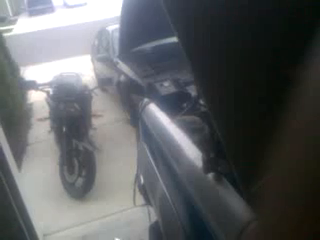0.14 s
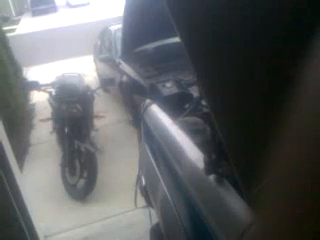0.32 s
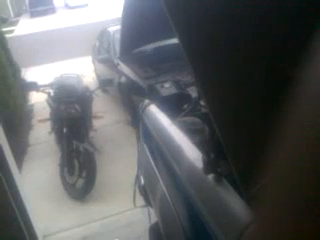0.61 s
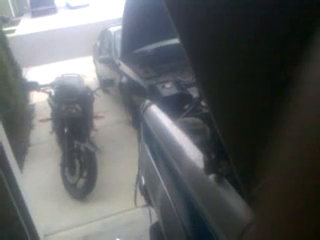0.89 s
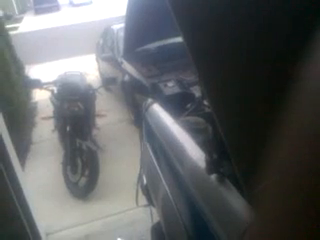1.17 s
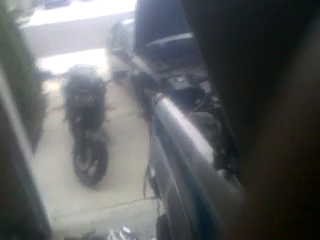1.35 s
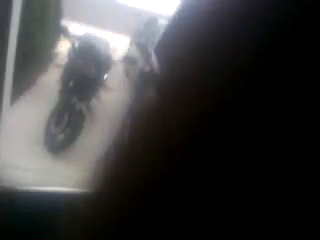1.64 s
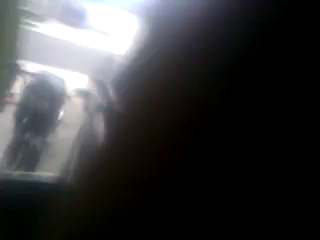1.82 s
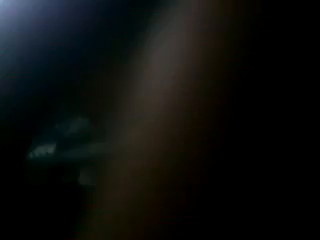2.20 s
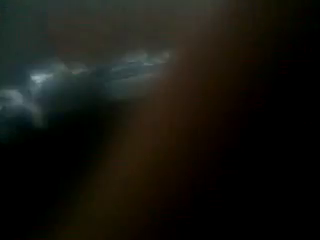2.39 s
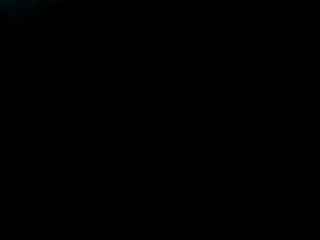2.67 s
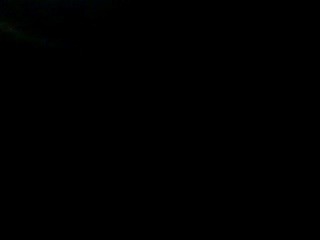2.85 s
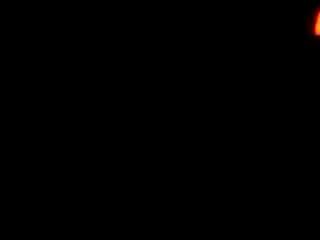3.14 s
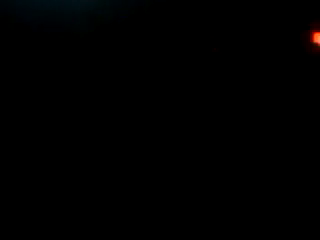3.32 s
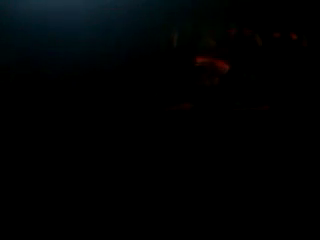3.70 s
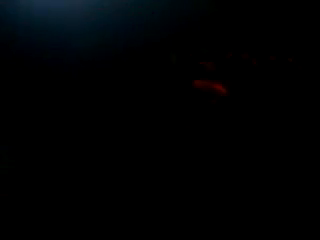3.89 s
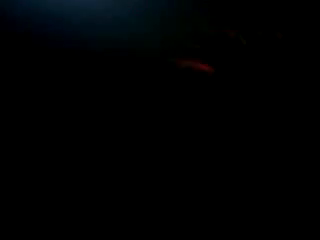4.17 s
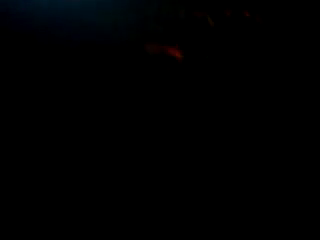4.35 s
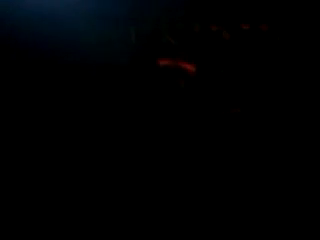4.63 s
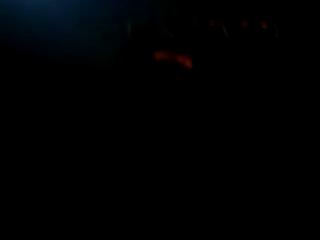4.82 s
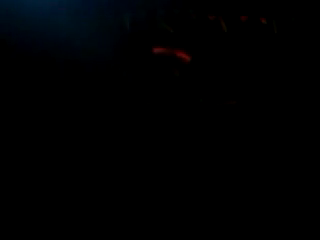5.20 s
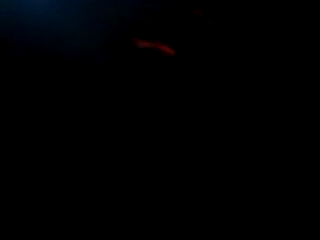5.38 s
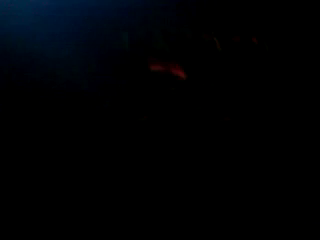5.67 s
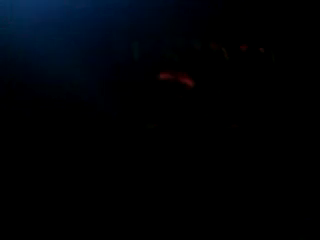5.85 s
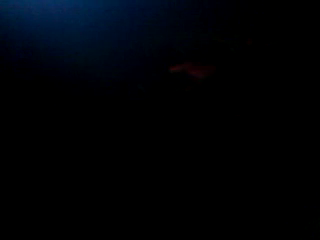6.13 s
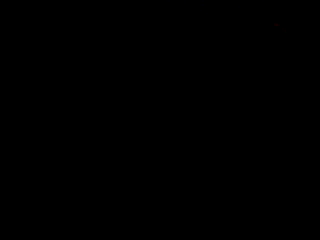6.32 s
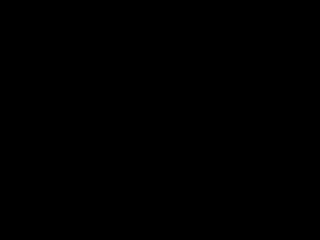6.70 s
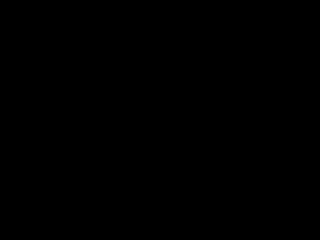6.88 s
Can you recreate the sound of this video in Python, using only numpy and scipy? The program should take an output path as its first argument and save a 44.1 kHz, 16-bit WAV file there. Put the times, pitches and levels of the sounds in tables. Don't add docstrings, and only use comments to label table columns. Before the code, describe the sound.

A large diesel truck idles unevenly close by, its block knocking sharply over fan hiss and low rumble. Hand bumps rattle the microphone as it moves into the cab, where the clatter dulls and low air boom takes over. The door thuds shut, a latch snaps, idling continues, then three quick throttle stabs roar and fall away. The sound is narrow and lo-fi, with brief thin whistles.

```python
import sys
import numpy as np
from scipy import signal
from scipy.fft import rfft, irfft
from scipy.io import wavfile
from scipy.ndimage import uniform_filter1d

SR = 44100
rng = np.random.default_rng(int(sys.argv[2]) if len(sys.argv) > 2 else 0)


def undo_db(level):
    steps = np.asarray(level, float) / 20
    return 10 ** steps


def transcribe(signal):
    frames = np.atleast_2d(signal).T
    limited = np.clip(frames, -1, 1)
    pcm = np.round(limited * 32767).astype(np.int16)
    wavfile.write(sys.argv[1], SR, pcm)


N = 309573
T = np.arange(N) / SR


def level(x, db):
    return x * undo_db(db) / np.sqrt(np.mean(x ** 2))


def curves(table):
    s, *columns = np.transpose(table)
    return [np.interp(T, s, c) for c in columns]


def near(x, centre, span):
    return np.exp(-((x - centre) / span) ** 2)


def noise():
    return rng.standard_normal(N)


def walk(rate):
    k = int(SR / rate)
    held = np.repeat(rng.standard_normal(N // k + 1), k)
    return 1.7 * uniform_filter1d(uniform_filter1d(held, k), k)[:N]


def colour(x, points):
    hz, db = np.transpose(points)
    grid = np.maximum(np.arange(4097) * SR / 8192, 1)
    gain = np.interp(np.log(grid), np.log(hz), db)
    gain -= 60 * np.clip(np.log2(grid / hz[-1]), 0, 1)
    gain -= 40 * np.clip(np.log2(hz[0] / grid), 0, 1)
    cep = irfft(gain * np.log(10) / 20)
    cep[1:4096] *= 2
    cep[4097:] = 0
    return level(signal.fftconvolve(x, irfft(np.exp(rfft(cep))))[:N], 0)


def ring(x, hz, width):
    return level(signal.lfilter(*signal.iirpeak(hz, hz / max(width, 2), fs=SR), x), 0)


def add(out, s, sound):
    i = int(s * SR)
    out[i:i + len(sound)] += sound[:N - i]


def bursts(phase, decay, floor, scatter_db, pattern):
    cylinder_db = [-0.5, -9, -2, -4.5, -7, -3.5, 0, -5.5]
    k = phase.astype(int)
    db = pattern * np.array(cylinder_db)[k % 8] + scatter_db * rng.standard_normal(N // 100)[k]
    envelope = undo_db(db) * (floor + np.exp(-(phase % 1) / decay))
    return noise() * uniform_filter1d(envelope, 60)


def clatter(rate, spread_db):
    size_db = spread_db * np.minimum(rng.exponential(size=N), 3)
    return (rng.random(N) < rate / SR) * undo_db(size_db) * np.sign(noise())


def chugs():
    # t/s, length/s, level over the soft ones/dB
    hard_firings = [(0.026, 0.029, 5.5), (0.139, .12, 7.5), (0.391, 0.057, 5), (0.484, .12, 7.5),
                    (0.742, 0.026, 2), (0.861, 0.084, 4), (1.063, 0.071, 6.5), (1.225, 0.076, 4.5),
                    (1.42, 0.053, 5), (1.546, 0.09, 4), (1.75, 0.13, 3.5), (1.937, 0.058, 5),
                    (2.13, .04, 2), (2.227, 0.039, 5), (2.304, 0.03, 3.5), (2.386, 0.068, 3),
                    (2.625, 0.079, 4), (2.823, 0.036, 4), (3.083, 0.018, 4.5), (3.145, 0.043, 5),
                    (3.46, 0.11, 1.5), (3.678, 0.055, 6), (3.845, 0.075, 4), (4.016, 0.07, 5),
                    (4.194, 0.073, 6), (4.35, 0.087, 5.5), (4.54, 0.068, 5.5), (4.712, 0.07, 6),
                    (4.882, 0.07, 6), (5.04, 0.039, 2.5)]
    attack_s, release_s = 0.0093, 0.036
    rises = []
    for s, hold, db in hard_firings:
        times = (s - attack_s, s, s + hold, s + hold + release_s)
        rises.append(np.interp(T, times, (0, db, db, 0)))
    return np.max(rises, axis=0)


def hiss(phase, load):
    # f/Hz, level/dB
    idle_air = [(1710, -30), (2900, -15), (3620, -11), (4130, -9), (5100, -11), (6740, -12), (7270, 5),
                (7500, -30.5), (9750, -59), (16500, -120)]
    # f/Hz, level/dB
    intake_roar = [(1710, -33.5), (2900, -26.5), (3430, -9), (4620, -2), (6710, -6.5), (7500, 6.5),
                   (9750, -42.5), (16500, -120)]
    air = bursts(phase, .3, 4, .7, .2)
    return (1 - load) * colour(air, idle_air) + load * colour(air, intake_roar)


def injectors(inside):
    # f/Hz, width/Hz, level outside/dB, level inside/dB
    line_modes = [(4040, 38, -42, -55), (4130, 110, -48.5, -58), (4400, 90, -52, -56)]
    # t/s, level over their murmur/dB
    sung_moments = [
        (.3, 7),
        (.5, 3),
        (.76, 6),
        (.89, 5),
        (1.13, 4),
        (1.25, 7),
        (1.55, 4),
        (1.97, 5),
    ]
    streaks = 2.2 * walk(11) + sum(db * near(T, s, .035) for s, db in sung_moments)
    out = np.zeros(N)
    for hz, width, out_db, in_db in line_modes:
        out += undo_db(out_db + inside * (in_db - out_db) + streaks) * ring(noise(), hz, width)
    return out


def panels(phase):
    # f/Hz, level/dB
    panel_response = [(160, -20), (280, -2.5), (437, -6.5), (544, -4.5), (630, -3), (668, -4.5),
                      (755, -1.5), (900, -1.5), (1170, -12.5), (1980, -120)]
    return colour(bursts(phase, 1.0, 1.0, 1.5, .3), panel_response)


def rumble(phase, inside):
    # f/Hz, level/dB
    fender_response = [(8.8, -29), (15, -25), (54, -8.5), (168, -4.5), (330, -16.5), (430, -30),
                       (730, -120)]
    # f/Hz, level/dB
    cab_response = [(20, -1), (40, -1), (62, 0), (90, -9), (140, -0.5), (170, 0.5), (200, -12.5), (260, -3),
                    (330, -15)]
    # f/Hz, width/Hz, level outside/dB, level inside/dB
    air_modes = [(125.2, 9.2, -8, -12), (165, 14, -12, -3), (85.6, 12, -30, -3.5)]
    shake = bursts(phase, .5, 2, 1, .3)
    total = (1 - inside) * colour(shake, fender_response) + inside * colour(shake, cab_response)
    for hz, width, out_db, in_db in air_modes:
        total += undo_db(out_db + inside * (in_db - out_db) + walk(14)) * ring(shake, hz, width)
    return level(total, 0)


def cab_mode(phase, hz, inside, rev, off):
    mode_hz, sing_hz = 241.7, 240
    pulses = np.diff(np.floor(phase), prepend=0.)
    sung = ring(level(pulses, 0) + level(noise(), 0), mode_hz, 25)
    sung = ring(sung, mode_hz, 40)
    sung = sung / np.sqrt(uniform_filter1d(sung ** 2, size=5000))
    crossing = near(hz * np.round(sing_hz / hz), sing_hz, 4.5)
    lope_db = 5 * np.cos(2 * np.pi * (phase / 8 - 0.79))
    out_db, in_db = -52.5, -47
    db = out_db + inside * (in_db - out_db) + (1 - off) * lope_db + rev * (15 + 9 * crossing)
    return undo_db(db) * sung


def thud(db, hz, t60):
    t = np.arange(int(t60 * SR)) / SR
    return undo_db(db) * np.sin(2 * np.pi * hz * t) * 1000 ** (-t / t60) * (1 - np.exp(-t * hz * 8))


def handling():
    # t/s, peak level/dB, f/Hz, t60/s
    bumps = [(2.063, -20.5, 213, 0.034), (2.125, -12, 260, 0.017), (2.181, -14, 202, 0.044),
             (2.207, -15, 180, 0.013), (2.25, -19, 202, 0.051), (2.357, -18.5, 110, 0.028),
             (2.398, -17.5, 277, 0.023), (2.788, -22, 300, 0.016), (2.796, -21, 150, 0.094),
             (2.855, -11.5, 199, 0.012), (2.857, -21, 597, 0.012), (5.302, -19, 165, 0.072),
             (5.279, -22.5, 79, 0.081), (6.33, -21, 160, 0.053), (5.285, -22, 241.4, .15),
             (6.3, -24, 239, 0.11)]
    # t/s, peak level/dB, f/Hz, rise/s
    door = [
        (2.8213, -2.6, 70, .0068),
        (2.8238, -8.5, 105, .007),
        (2.834, -15, 55, .015),
    ]
    # t/s, peak level/dB, strong ring f/Hz, weak ring f/Hz, t60/s
    snaps = [
        (.372, -14, 1900, 2400, .09),
        (2.39, -13, 1900, 2400, .12),
        (2.786, -21, 1500, 5000, .03),
        (2.821, -19, 4200, 600, .04),
        (3.336, -13, 3800, 750, .05),
        (4.255, -29, 6900, 6300, .18),
        (5.785, -19, 2200, 2100, .08),
        (6.262, -14, 1300, 2700, .06),
    ]
    # t/s, peak level/dB, strong ring f/Hz, weak ring f/Hz, t60/s
    latch = (3.333, -4.5, 1700, 6300, .06)
    out = np.zeros(N)
    for s, db, hz, t60 in bumps:
        add(out, s, 2.2 * thud(db, hz, t60))
    for s, db, hz, rise in door:
        u = T[:6000] / rise
        add(out, s, -undo_db(db) * (u * np.exp(1 - u)) ** 2 * np.sin(2 * np.pi * hz * T[:6000]))
    for s, db, strong_hz, weak_hz, t60 in [latch] + snaps:
        crack = rng.standard_normal(8192)[:int(t60 * SR)]
        crack = crack * 1000 ** (-np.arange(len(crack)) / SR / t60)
        low, high = [signal.lfilter(*signal.iirpeak(hz, 3, fs=SR), crack) for hz in (strong_hz, weak_hz)]
        snap = 3 * low + 1.1 * high + .45 * crack
        add(out, s, undo_db(db) * snap / (2.2 * snap[:250].std()))
    return out


def boom(phase, hz, fuel, inside, boom_db, off):
    drift_db = 3.5 * np.maximum(off, 0.3 * (1 - inside)) * walk(12)
    first_db = boom_db + off * (-19.5 + 0.52 * fuel) + drift_db
    second_db = -51.5 + 17.5 * near(2 * hz, 163.6, 25) + 3 * off * walk(12)
    wobble = .02 * walk(8)
    out = np.zeros(N)
    for k, db in enumerate((first_db, second_db), start=1):
        out += np.sqrt(2) * undo_db(db + .5 * walk(11)) * np.sin(2 * np.pi * k * (phase + wobble))
    return out


def rap(phase):
    blows = level(bursts(phase, .5, 1.2, 1.8, 0.25), 0) + level(clatter(900, 1.5), -2.5)
    for _ in range(3):
        blows = ring(blows, 2083, 1140)
    return blows


def knock(phase, inside, load):
    # f/Hz, level/dB
    block_bare = [(350, -38), (600, -7), (631, -15), (669, -15.5), (779, -6.5), (1100, -2), (1190, -3.5),
                  (1500, 3), (1920, 6.5), (2090, -1), (2350, -0.5), (3160, -23.5), (3400, -36.5),
                  (4420, -40), (7480, -120)]
    # f/Hz, level/dB
    block_firewall = [(350, -49.5), (600, -11.5), (741, -9.5), (914, -13), (1250, -7), (1430, -4.5),
                      (1820, 0), (2250, -0.5), (2450, -8.5), (2710, -10), (3400, -26), (4420, -29.5),
                      (7480, -120)]
    # f/Hz, level/dB
    block_loaded = [(350, -28.5), (600, -11.5), (841, -7), (913, -9), (1250, -6.5), (1390, -6), (1500, 1),
                    (2240, 0), (2400, -3), (2750, 0), (3600, -20), (4680, -58), (7920, -120)]
    # f/Hz, width/Hz, level/dB
    block_modes = [(1219, 158, -10.5), (1733, 220, -13), (2255, 68, -22.5), (2500, 48, -32)]
    blows = level(bursts(phase, 0.77, 2.7, 1.16, 0.24), 0) + level(clatter(1500, 0.29), -7)
    rings = sum(undo_db(db + 2.2 * walk(12)) * ring(blows, hz, width) for hz, width, db in block_modes)
    cab = (1 - load) * colour(blows, block_firewall) + load * colour(blows, block_loaded)
    return level((1 - inside) * colour(blows, block_bare) + inside * cab + rings, 0)


def scene():
    # t/s, share inside/0-1, nearness level/dB, boom coupling level/dB
    place = [(0, 0.03, 0.5, -32), (.58, 0.02, -0.5, -37.5), (.73, 0.01, 0.5, -45), (.84, 0, -0.5, -33.5),
             (1.63, 0.06, 1, -37.5), (2.05, 0.02, -0.5, -37.5), (2.19, 0, 2.5, -50), (2.35, 0, 0, -27.5),
             (2.47, 0.7, 6, -43), (2.58, 0.98, -0.5, -29.5), (2.77, 0.84, 5, -42), (2.93, 0.96, 2, -30),
             (3.29, 0.95, 2, -27), (3.52, 0.92, 0, -32.5), (3.73, 1, -0.5, -27), (4.0, 1, 0.5, -28),
             (5.0, 0.93, -0.5, -27.5), (7.02, 0.98, 0, -34.5)]
    # t/s, firing rate f/Hz
    speed = [(0, 46.1), (5.264, 46.2), (5.32, 73.6), (5.336, 79), (5.406, 83.8), (5.508, 79.8),
             (5.756, 57.4), (5.802, 55), (5.958, 78.5), (6.054, 66.2), (6.196, 58.4), (6.278, 72.5),
             (6.334, 81.7), (6.4, 83.8), (6.52, 75.8), (6.854, 46.7), (6.886, 44), (7.02, 46.3)]
    # t/s, fuel level over idle/dB
    stabs = [
        [(5.05, 0), (5.19, 7), (5.215, 13), (5.32, 13.5), (5.374, 10), (5.404, 13), (5.48, 5.5), (5.51, 5),
         (5.76, -2.5)],
        [(5.778, -3.5), (5.79, 7.5), (5.87, 6), (5.96, 10.5), (6.01, 7), (6.074, 3), (6.134, -0.5), (6.17, 4.5),
         (6.22, 2.5)],
        [(6.245, 3.5), (6.265, 13.5), (6.35, 13), (6.39, 7), (6.45, 6.5), (6.6, 3), (6.865, -8), (6.885, -.5),
         (7.02, -4)],
    ]
    # outside level/dB, inside level/dB, share of fuel, share of chug, level at full revs/dB
    knock_law = (-26, -34, 1.3337, 1.022, -1)
    hiss_law = (-30, -38.5, 1.09, 0.45, 5)
    panel_law = (-31.5, -44.5, 0.15, 0.28, 8.5)
    rumble_law = (-32.5, -41, 0.45, -0.12, 2)
    rap_law = (-38.5, -49.5, 0.5, 1.7, -1)
    idle_hz, full_rev_hz = 46.1, 84

    inside, near_db, boom_db = curves(place)
    hz, = curves(speed)
    fuel, = curves(np.vstack(stabs))
    rev = np.clip((hz - idle_hz) / (full_rev_hz - idle_hz), 0, 1)
    chug = chugs()
    load = np.clip(.065 * fuel + .2 * rev, 0, 1)
    slow = uniform_filter1d(fuel, int(0.035 * SR))
    phase = 0.23 + np.cumsum(hz) / SR
    off = 1 - near(hz, idle_hz, 8.9)

    def gain(law, drive):
        out_db, in_db, fuel_share, chug_share, rev_db = law
        place_db = out_db + inside * (in_db - out_db) + near_db
        return undo_db(place_db + fuel_share * drive + chug_share * chug + rev_db * rev)

    mix = gain(hiss_law, slow) * hiss(phase, load) + injectors(inside)
    mix += gain(panel_law, slow) * panels(phase) + gain(rumble_law, slow) * rumble(phase, inside)
    mix += cab_mode(phase, hz, inside, rev, off) + handling()
    mix += boom(phase, hz, fuel, inside, boom_db, off)
    mix += gain(rap_law, fuel) * rap(phase) + gain(knock_law, fuel) * knock(phase, inside, load)
    return mix[None]


def whistles():
    # first grid step, whistles, peak level/dB
    whistle_runs = [(0, 1, -42), (1, 2, -50), (6, 2, -49), (8, 1, -38), (12, 1, -43), (15, 1, -48),
                    (18, 1, -50), (30, 1, -42), (31, 3, -51), (34, 1, -38), (35, 2, -46), (37, 2, -41),
                    (39, 3, -52), (44, 2, -48), (48, 1, -43), (52, 1, -30), (53, 1, -46), (58, 1, -58),
                    (63, 1, -57), (66, 1, -51), (71, 1, -56), (75, 6, -57), (81, 1, -50), (82, 2, -35),
                    (84, 3, -40), (87, 1, -55), (91, 1, -55), (92, 1, -43), (98, 3, -45), (108, 2, -63)]
    start_s, frame_s = .0218, 1024 / 16000
    return [(start_s + (k + j) * frame_s, db) for k, n, db in whistle_runs for j in range(n)]


def short_frames(t):
    until = np.array([[s] for s, db in whistles() if db < -47]) - t
    return ((until > -.012) & (until < .056)).any(axis=0)


def starve(x, frame, size, lost, above_hz, spans):
    window = np.sqrt(np.hanning(2 * frame + 1)[:-1])
    hz, t, z = signal.stft(x, SR, window, 2 * frame, frame)
    luck = rng.standard_normal((len(hz) // size + 1, len(t)))
    luck = uniform_filter1d(luck, size=3, axis=1) * np.sqrt(3)
    gone = np.repeat(luck > lost, size, axis=0)[:len(hz)]
    gone = gone & (hz[:, None] > above_hz) & spans(t)
    return signal.istft(np.where(gone, 0, z), SR, window, 2 * frame, frame)[1][:N]


def roll_off(x):
    return signal.sosfilt(signal.butter(12, 9260, fs=SR, output="sos"), x)


def record(dry):
    # t from/s, t to/s, above f/Hz
    gaps = [
        (2.8, 2.806, 3000),
        (2.806, 2.818, 5500),
        (3.297, 3.313, 5600),
        (3.311, 3.325, 2800),
        (6.24, 6.254, 3400),
    ]
    half_rate_hz, ceiling, frame = 8000, .705, 2822
    x = starve(dry[0], frame, 14, 1.3, 3300, lambda t: ~short_frames(t))
    x = starve(x, frame // 8, 5, .8, 4600, short_frames)
    for s0, s1, hz in gaps:
        treble = signal.sosfiltfilt(signal.butter(8, hz, "high", fs=SR, output="sos"), x)
        x = x - treble * uniform_filter1d(1. * ((T > s0) & (T < s1)), size=88)
    x = signal.sosfiltfilt(signal.cheby2(12, 45, 7650, fs=SR, output="sos"), x)
    image_band = signal.butter(3, (8600, 8950), "band", fs=SR, output="sos")
    mirror = signal.sosfilt(image_band, x * np.cos(4 * np.pi * half_rate_hz * T))
    x = x + undo_db(-25) * mirror + .0014
    shape = np.hanning(int(.014 * SR))
    tone = shape * np.sin(2 * np.pi * half_rate_hz * T[:len(shape)])
    for s, db in whistles():
        add(x, s - .003, undo_db(db) * tone)
    return roll_off(np.clip(x, -ceiling, ceiling)[None])


dry = scene()
out = record(dry)
transcribe(out)
```